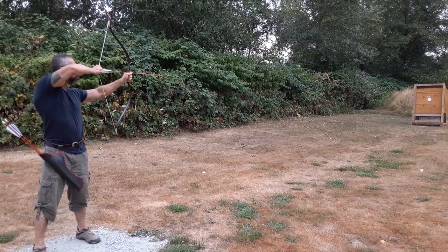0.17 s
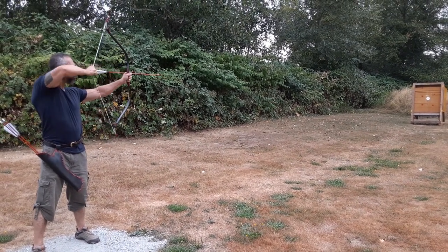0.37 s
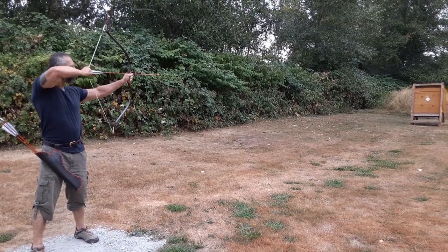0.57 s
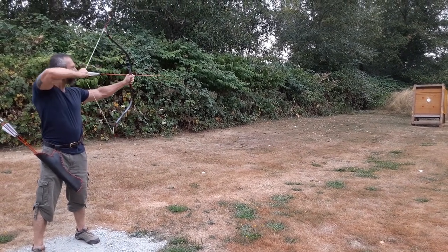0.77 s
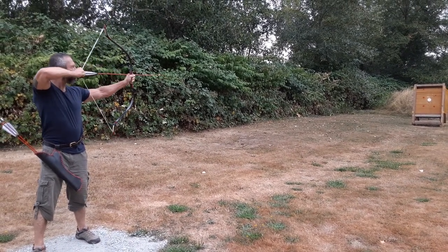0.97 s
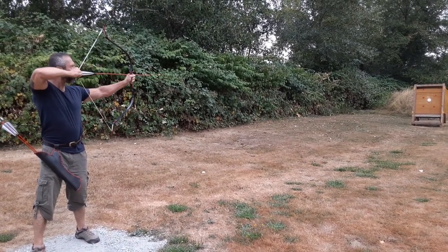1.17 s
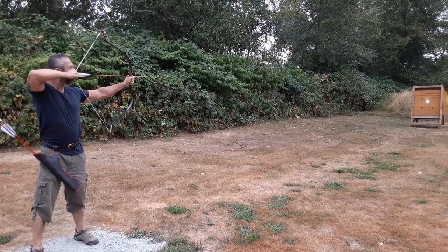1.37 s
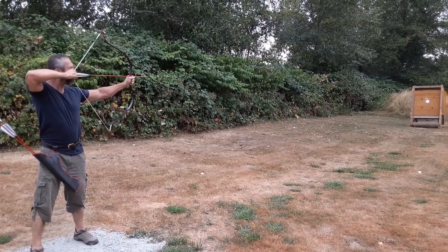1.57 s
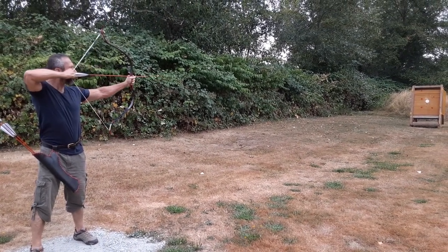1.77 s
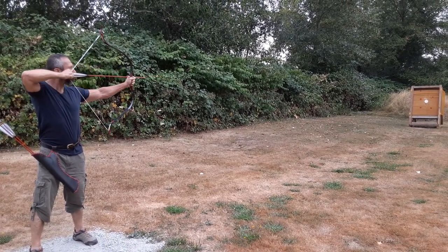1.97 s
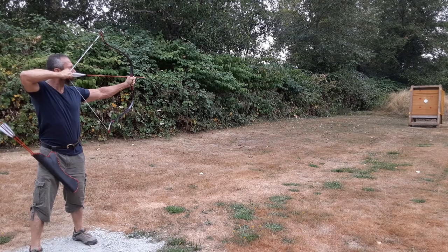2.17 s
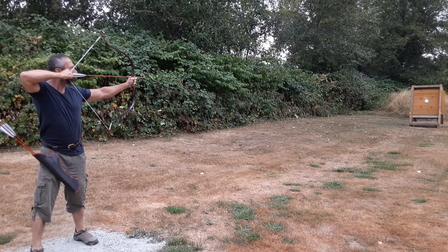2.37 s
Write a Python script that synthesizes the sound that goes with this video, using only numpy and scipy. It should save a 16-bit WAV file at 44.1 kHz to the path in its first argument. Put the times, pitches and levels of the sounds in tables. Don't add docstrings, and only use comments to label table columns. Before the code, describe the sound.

A calm outdoor background of far road drone, barely rustling leaves and a thin machine hum on the left; a high bird whistles faintly twice, and a hedge bird's chips end in a quick burst, in wide stereo.

```python
import sys
import numpy as np
from scipy import signal
from scipy.fft import rfft, irfft
from scipy.io import wavfile
from scipy.ndimage import uniform_filter1d

SR = 44100
rng = np.random.default_rng(int(sys.argv[2]) if len(sys.argv) > 2 else 0)


def natural_amplitude(level_db):
    exponent = np.asarray(level_db, float) / 20
    return 10 ** exponent


def unload_audio(sound):
    columns = np.transpose(np.atleast_2d(sound))
    steps = np.round(np.clip(columns, -1, 1) * 32767)
    wavfile.write(sys.argv[1], SR, steps.astype(np.int16))


N = 111573
TIME = np.arange(N) / SR
HZ = np.maximum(np.fft.rfftfreq(N, 1 / SR), 1)


def level(x, db):
    return x * natural_amplitude(db) / np.sqrt(np.mean(x ** 2))


def across(table, order):
    rows = np.array(table, float)
    return np.interp(np.log(HZ), np.log(rows[:, 0]), rows[:, order])


def walk(rate):
    hold = int(SR / rate)
    steps = np.repeat(rng.standard_normal(N // hold + 1), hold)
    return 1.313 * uniform_filter1d(uniform_filter1d(steps, hold), hold)[:N]


def diffuse(gain):
    # (frequency [Hz], likeness of left and right [0-1], lead of the right [rad])
    pair = [(60.5, 1, 0), (190, 0.89, 0), (356, 0.93, 0.73), (490, 0.54, -1.3), (805, 0.39, 0),
            (906, 0, 1.3), (1260, 0.29, 3), (2170, 0.12, 7.5), (2800, 0, 9)]
    # (frequency [Hz], difference [dB])
    lean = [(60, 3), (200, 1.5), (400, 3), (700, 1.5), (1500, 0.9), (2400, 3.5), (3800, 5), (5000, 1),
            (8000, 3), (11000, -2.5)]
    shared, other = rfft(rng.standard_normal((2, N)))
    alike = np.clip(across(pair, order=1), 0, 1)
    tilt = natural_amplitude(across(lean, order=1) / 2)
    right = alike * np.exp(1j * across(pair, order=2)) * shared + np.sqrt(1 - alike ** 2) * other
    return gain * np.array([shared * tilt, right / tilt])


def bed(colour, db, swell_db, flicker_db, flicker_rate):
    lo_hz, hi_hz = colour[0][0], colour[-1][0]
    spectra = diffuse(natural_amplitude(across(colour, order=1)) * (HZ >= lo_hz) * (HZ < hi_hz))
    out, swell = 0, walk(1.7)
    first, last = np.floor(2 * np.log2(lo_hz)), np.ceil(2 * np.log2(hi_hz))
    for step in np.arange(first, last + 1):
        band = np.cos(np.pi / 2 * np.clip(2 * np.log2(HZ) - step, -1, 1)) ** 2
        out = out + irfft(spectra * band, N) * natural_amplitude(swell_db * swell + flicker_db * walk(flicker_rate))
    return level(out, db)


def microphone_hiss():
    # (frequency [Hz], density [dB per Hz])
    hiss_colour = [(7300, -19), (9650, -17.5), (10500, -8), (12100, -2), (15100, -1.5), (15750, -.5)]
    return bed(hiss_colour, db=-72, swell_db=0.1, flicker_db=0.45, flicker_rate=16)


def road_rumble():
    # (frequency [Hz], density [dB per Hz])
    rumble_colour = [(15, -42), (25, -29.5), (47, -4), (70, -0.5), (117, -2.5), (200, -9), (297, -14),
                     (480, -18.5)]
    # (time [s], rumble level [dB])
    traffic = [(0, -46), (.35, -45.5), (.6, -49.5), (.95, -46), (1.3, -47.5), (1.75, -46), (2.2, -47),
               (2.4, -46), (2.53, -53.5)]
    # (frequency [Hz], width [Hz], level [dB])
    engines = [
        (64.7, 8.3, -65.5),
        (73.5, 15, -59.5),
        (97.8, 11, -58),
        (119.2, 7, -68.5),
        (803, 60, -66),
        (931, 50, -72.5),
    ]
    near = uniform_filter1d(np.interp(TIME, *np.array(traffic).T), SR // 10)
    nearness_db = near - near.mean()
    drones = 0
    for hz, width_hz, db in engines:
        resonance = 1 / (1 + (2 * (HZ - hz) / width_hz) ** 2)
        drones = drones + level(irfft(diffuse(resonance), N), db)
    rumble = bed(rumble_colour, db=-48, swell_db=0.49, flicker_db=0.37, flicker_rate=4.76)
    return rumble * natural_amplitude(0.61 * nearness_db) + drones * natural_amplitude(nearness_db)


def tyre_roar():
    # (frequency [Hz], density [dB per Hz])
    tyre_colour = [(480, -6), (741, -3), (808, -2), (950, -3.5), (1130, -7.5), (1420, -7), (1740, -12),
                   (2700, -24)]
    # (time [s], level [dB])
    rolling = [(0, 0), (.08, 0.5), (.25, 0), (.45, 0), (1.4, 0), (1.8, 0), (2.2, 0), (2.53, -0.5)]
    roar = bed(tyre_colour, db=-54.5, swell_db=0.28, flicker_db=0.36, flicker_rate=7.76)
    return roar * natural_amplitude(np.interp(TIME, *np.array(rolling).T))


def leaves():
    # (frequency [Hz], density [dB per Hz])
    leaf_colour = [(2700, -0.5), (3600, -3), (3980, -1), (4360, -6.5), (5000, -5.5), (5500, -11),
                   (7300, -19)]
    return bed(leaf_colour, db=-72.5, swell_db=0.14, flicker_db=0.74, flicker_rate=12)


def camera_whine():
    # (frequency [Hz], level at the left [dB], left minus right [dB], lead of the right [rad])
    tones = [(360, -72, 8, 0), (420, -74, 8, 0), (598, -73, 8, 0), (1197, -68.5, 10, 3.),
             (1680, -79, 5, 4.5), (1978, -85.5, -2, 5.5), (3833, -86, 12, 0), (3967, -86.5, 12, 0)]
    width_hz, waver_db = 2.5, 2
    out = 0
    for hz, db, lean_db, lead in tones:
        phase = 2 * np.pi * (hz * TIME + np.cumsum(width_hz / 2 * walk(5.79)) / SR)
        pair = np.array([np.sin(phase), natural_amplitude(-lean_db) * np.sin(phase + lead)])
        out = out + np.sqrt(2) * natural_amplitude(db + waver_db * walk(4.23)) * pair
    return out


def far_bird():
    # (time [s], length [s], first pitch [Hz], last pitch [Hz], level [dB])
    seeps = [
        (.27, .33, 9200, 6900, -90.5),
        (1.68, .3, 8150, 7550, -89.5),
    ]
    blur_hz, blur_rate = 380, 600
    flutter_db, edge_s, right_db = 2, 0.03, -6
    out = 0
    for start, length, first_hz, last_hz, db in seeps:
        shape = np.clip(np.minimum(TIME - start, start + length - TIME) / edge_s, 0, 1)
        hz = np.interp(TIME, [start, start + length], [first_hz, last_hz])
        ways = []
        for _ in range(2):
            phase = 2 * np.pi * np.cumsum(hz + blur_hz * walk(blur_rate)) / SR
            ways.append(np.sin(phase) * natural_amplitude(flutter_db * walk(39.5)))
        out = out + np.sqrt(2) * natural_amplitude(db) * shape * np.array(ways)
    return out * natural_amplitude(np.array([[0], [right_db]]))


def hedge_bird():
    # (time [s], pitch [Hz], level [dB], length [s])
    chips = [
        (1.269, 3450, -71, .004),
        (1.353, 3600, -71, .022),
        (1.799, 3260, -69, .008),
        (2.064, 3700, -73, .024),
        (2.101, 3560, -62, .004),
        (2.111, 3450, -69, .01),
        (2.141, 3550, -70, .003),
    ]
    fall, split_hz, right_db = 0.01, 220, -15
    attack_s, release_s = 0.002, 0.005
    out = 0
    for start, hz, db, length in chips:
        t = np.maximum(TIME - start, 0)
        shape = np.clip(t / attack_s, 0, 1) * np.exp(-np.maximum(t - length, 0) / release_s)
        phase = 2 * np.pi * (hz - split_hz / 2) * (t - fall * t ** 2 / length / 2)
        voices = np.sin(phase) + 0.7 * np.sin(phase + 2 * np.pi * split_hz * t)
        out = out + natural_amplitude(db) * shape * voices
    return out * natural_amplitude(np.array([[0], [right_db]]))


def scene():
    return road_rumble() + tyre_roar() + leaves() + camera_whine() + far_bird() + hedge_bird()


def top_cut(x):
    return signal.sosfilt(signal.butter(12, 15890, fs=SR, output="sos"), x)


def record(dry):
    mix = dry + microphone_hiss()
    return top_cut(mix)


dry = scene()
out = record(dry)
unload_audio(out)
```